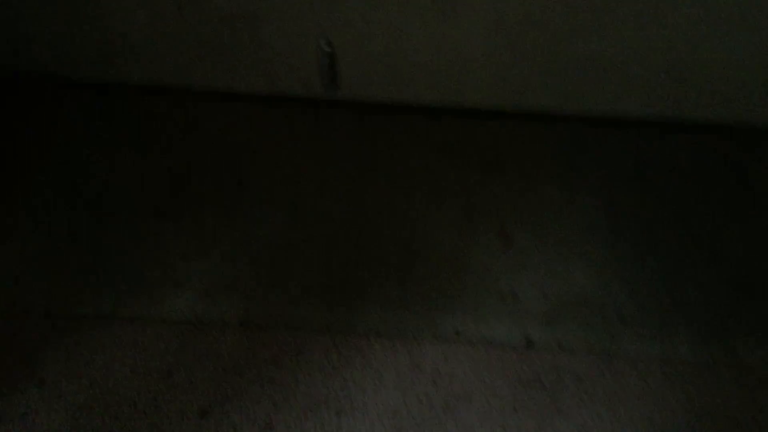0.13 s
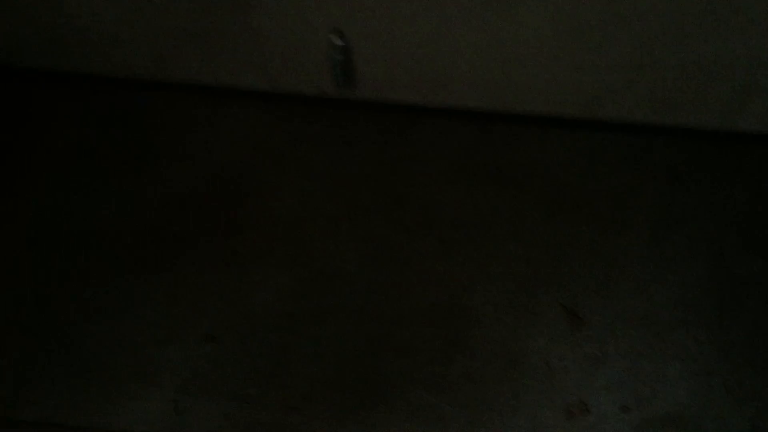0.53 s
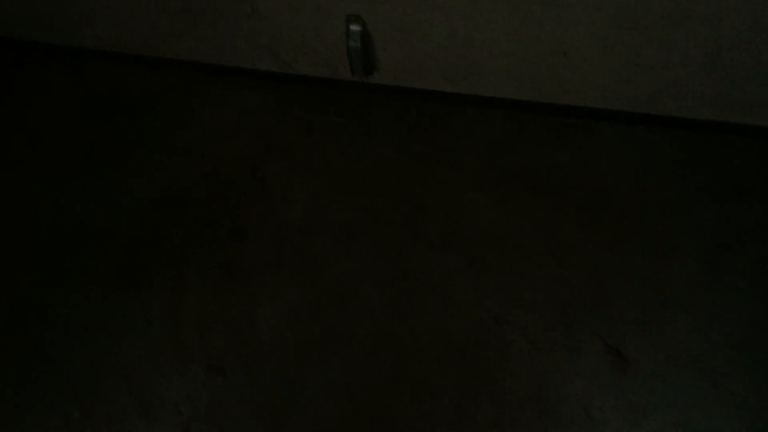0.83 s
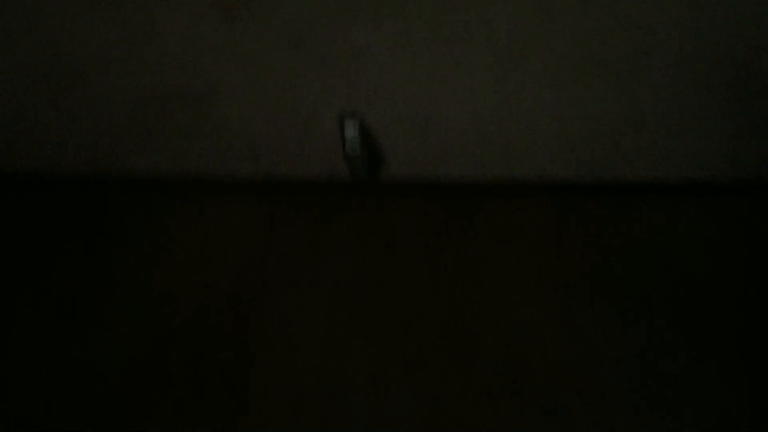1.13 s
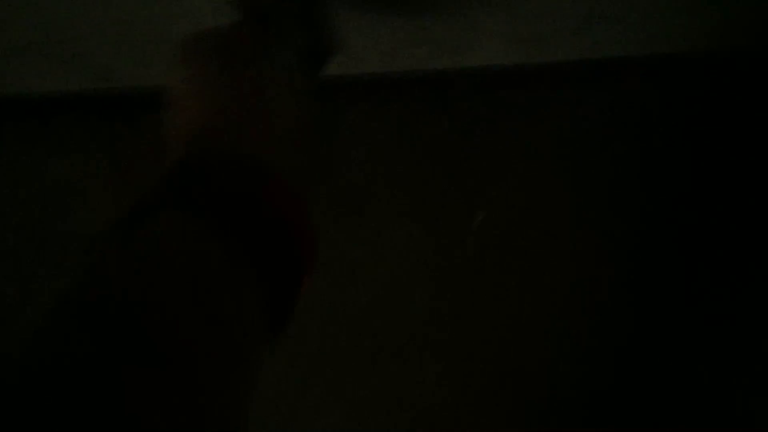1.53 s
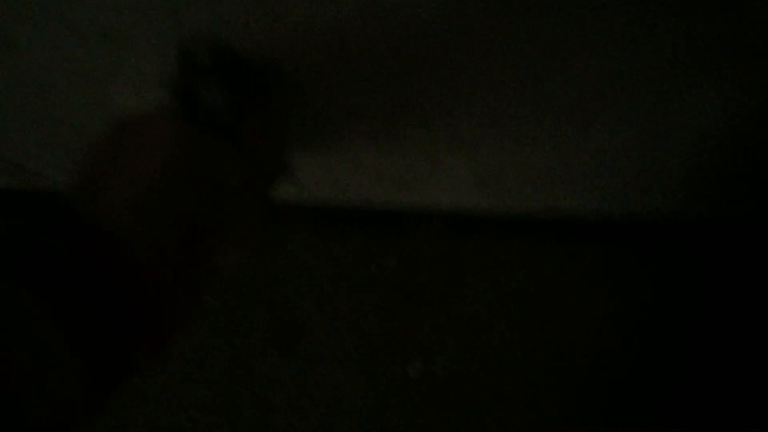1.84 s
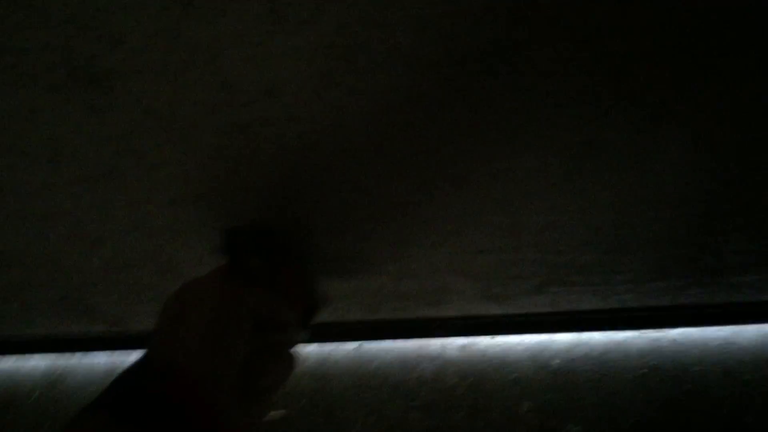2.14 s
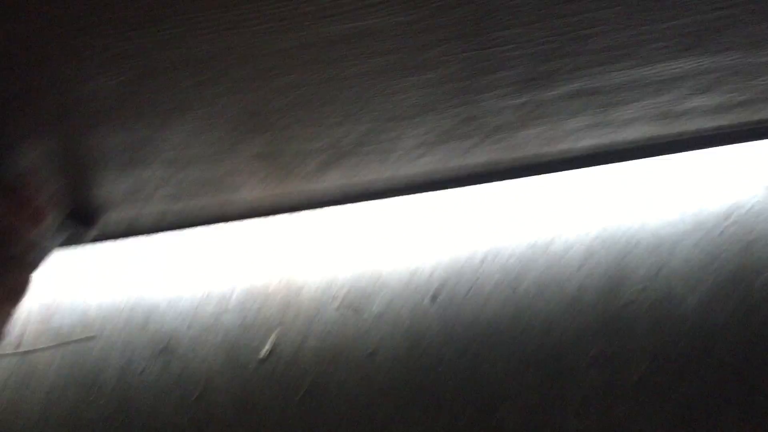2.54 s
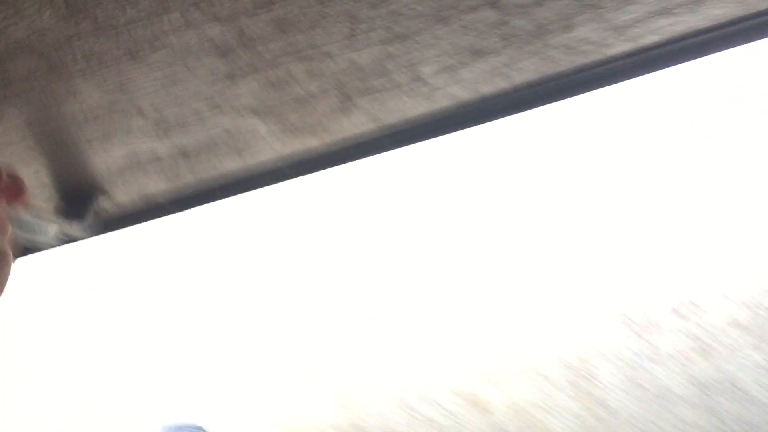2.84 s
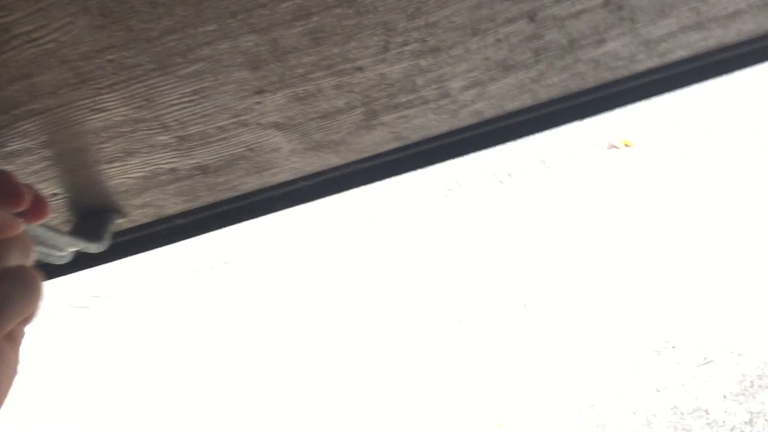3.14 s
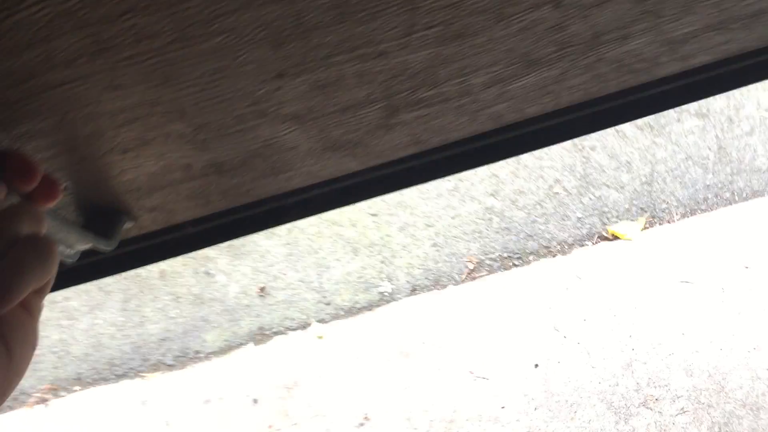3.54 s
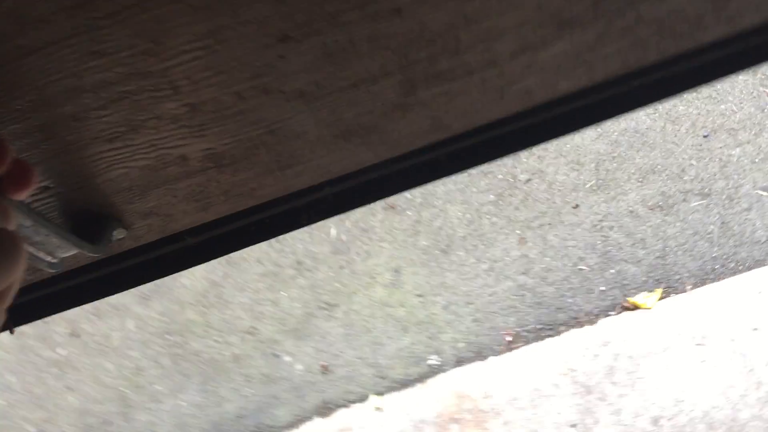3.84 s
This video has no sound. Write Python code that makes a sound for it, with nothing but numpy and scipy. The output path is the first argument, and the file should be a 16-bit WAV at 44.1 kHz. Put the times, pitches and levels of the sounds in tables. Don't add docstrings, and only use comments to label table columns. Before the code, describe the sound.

A metal garage door opens, heard close up inside a garage with short echo. Quiet low air and soft gritty shoe scuffs fill the first 1.4 seconds. A hand clanks the handle at 1.4; the latch turns and buzzes around 1.65, releasing sharply near 2.0. Rattles and a rough squeal follow at 2.3-2.6, a very loud bang at 2.67, then from 2.9 grinding, clattering, booming rolling continues to the cut-off at 4.

```python
import sys
import numpy as np
from scipy import signal
from scipy.fft import rfft, irfft, next_fast_len
from scipy.io import wavfile
from scipy.ndimage import uniform_filter1d, map_coordinates

SR = 44100
rng = np.random.default_rng(int(sys.argv[2]) if len(sys.argv) > 2 else 0)


def to_wav(sig):
    pcm = np.clip(np.atleast_2d(sig), -1, 1) * 32767
    pcm = np.round(pcm).astype(np.int16)
    wavfile.write(sys.argv[1], SR, pcm.T)


def invert_db(x):
    u = np.asarray(x, float) / 20
    return 10 ** u


N = 176400
T = np.arange(N) / SR


def unit(x):
    return x / np.sqrt(np.mean(x ** 2) + 1e-20)


def along(points, hz):
    f, v = np.transpose(points)
    return np.interp(np.log(hz + 1), np.log(f + 1), v)


def curve(rows, outside=-120):
    s, v = np.transpose(rows)
    return np.interp(T, s, v, left=outside)


def wobble(rate):
    knots = rng.standard_normal(int(N * rate / SR) + 4)
    return map_coordinates(knots, [T * rate])


def filtered(x, response):
    m = next_fast_len(len(x) + 8192)
    return irfft(rfft(x, m) * response(np.fft.rfftfreq(m, 1 / SR)), m)[:len(x)]


def peaks(table):
    def response(f):
        return sum((-1) ** k * invert_db(db) * 1j * f * w / (c * c - f * f + 1j * f * w)
                   for k, (c, w, db) in enumerate(table))
    return response


def grit(n, spiky_db):
    z = signal.stft(rng.standard_normal(n), nperseg=128)[2]
    patches = uniform_filter1d(rng.standard_normal(z.shape), size=4, axis=0)
    patches = uniform_filter1d(patches, size=3, axis=1)
    moments = uniform_filter1d(rng.standard_normal(z.shape[1]), size=2)
    size = unit(patches) + 0.69 * unit(moments)
    return unit(signal.istft(z * invert_db(spiky_db * size), nperseg=128)[1][:n])


def bursts(rows, response, attack_s, spiky_db):
    out, t = np.zeros(N + SR), T[:SR // 2]
    for s, db, bright_db, t60 in rows:
        def colour(f):
            return response(f) * invert_db(bright_db * np.log2(f / 3000 + 0.023))
        spray = unit(filtered(grit(len(t), spiky_db), colour))
        fade = invert_db(db - 8 - 60 * t / max(t60, .005))
        out[round(s * SR):][:len(t)] += fade * (1 - np.exp(-t / attack_s)) * spray
    return out[:N]


def rings(rows):
    out, t = np.zeros(N + SR), T[:SR // 2]
    for s, db, hz, t60 in rows:
        note = invert_db(db - 60 * t / t60) * np.sin(2 * np.pi * hz * t)
        out[round(s * SR):][:len(t)] += note * (1 - np.exp(-t / 0.00029))
    return out[:N]


def rolling():
    # [t/s, level/dB]
    effort = [(1.925, -55), (1.945, -41.5), (2.08, -42), (2.22, -42), (2.3, -33.5), (2.4, -45),
              (2.6, -37.5), (2.65, -37.5), (2.78, -44.5), (2.87, -29.5), (3.15, -31), (3.65, -31.5),
              (4, -28.5)]
    # [f/Hz, level/dB]
    grind_tone = [(150, -24), (250, 1), (443, -2.5), (633, 0.5), (2740, -6), (8430, -23), (16600, -37.5),
                  (17800, -54)]
    # [f/Hz, width/Hz, level/dB]
    panel_notes = [(55.7, 25, -4.5), (98.3, 17.7, -1), (137.6, 32, -7.5), (201.7, 22.3, -6),
                   (289.2, 28, -12.5), (620, 66, -16.5)]
    # [t/s, level/dB, brightness/dB, t60/s]
    joints = [(2.046, -33, 8, 0.2), (2.16, -25.5, 5.5, 0.088), (2.2388, -28, 10, 0.54),
              (2.2724, -7.5, 0, 0.17), (2.2963, -12, 5, 0.063), (2.6545, -4, -3, 0.066),
              (2.808, -23, 11.5, 0.15), (2.8355, -12, 4.5, 0.28), (2.9025, -1, 5, 0.091),
              (2.9374, -6.5, 11, 0.16), (2.9753, -7, 2, 0.18), (3.0433, -8, 2.5, 0.26),
              (3.1616, -13.5, 3, 0.23), (3.2213, -17.5, 1.5, 0.36), (3.3294, -8.5, 4.5, 0.096),
              (3.422, -11, 8.5, 0.039), (3.4511, -8, -0.5, 0.15), (3.5263, -12, 5, 0.098),
              (3.7017, -7.5, 1, 0.17), (3.7236, -9.5, 1, 0.16), (3.9282, -21.5, 5, 0.22),
              (3.9829, -15, 2.5, 0.14)]
    effort_db = curve(effort)
    grind = unit(filtered(grit(N, 1.5), lambda f: invert_db(along(grind_tone, f)))) + invert_db(-3) * flecks()
    grind_db = effort_db + 0.18 + 1.93 * wobble(25.14) + 2.06 * wobble(70)
    clatter = bursts(joints, steel, attack_s=0.0053, spiky_db=1.5)
    boom = unit(filtered(rng.standard_normal(N), peaks(panel_notes)))
    top_db, boom_db, boom_grows = effort_db[-1], 2, 1
    boom_level_db = top_db + boom_db + boom_grows * (effort_db - top_db) + 0.93 * wobble(12)
    return invert_db(grind_db) * grind + clatter + invert_db(boom_level_db) * boom


def flecks():
    count, middle_hz, pitch_spread, ring_cycles, scatter_db = 1800, 1907, .45, 20.5, 3
    when, pitch = rng.random(count), rng.standard_normal(count)
    size = np.minimum(rng.exponential(size=count), np.pi)
    hz, t = middle_hz * np.exp(pitch_spread * pitch)[:, None], T[:2048]
    level_db = scatter_db * size[:, None] - 60 * t * hz / (2 * np.pi * ring_cycles)
    pings = invert_db(level_db) * np.sin(2 * np.pi * hz * t)
    at = (N / 2 * (1 + when)).astype(int)[:, None] - SR // 10 + np.arange(len(t))
    out = np.bincount(at.ravel(), pings.ravel(), N)[:N]
    return out / np.sqrt(np.mean(out[N // 2:] ** 2))


def steel(f):
    # [f/Hz, level/dB]
    knock_tone = [(410, -35), (700, -13), (1990, 5), (2750, 7), (11400, -20.5), (16500, -35), (17800, -51)]
    # [f/Hz, width/Hz, level/dB]
    track_notes = [(1000, 76, -5.5), (1800, 30, 5), (2500, 130, -8.5), (2740, 210, 0), (3350, 31, -28)]
    detune, scatter_db, ring_db = .05, 3.5, 8.5
    luck = rng.standard_normal((len(track_notes), 2))
    woken = [(c * (1 + detune * a), w, db + scatter_db * b)
             for (c, w, db), (a, b) in zip(track_notes, luck)]
    return invert_db(along(knock_tone, f)) + invert_db(ring_db) * peaks(woken)(f)


def thuds():
    # [t/s, level/dB, f/Hz, t60/s]
    jolts = [(.232, -42, 189, 0.14), (.655, -50.5, 172, 0.38), (1.597, -25.5, 1330, 0.028),
             (1.41, -25.5, 216, 0.11), (1.4143, 5, 1410, 0.0021), (1.65, -18, 76, 0.17),
             (1.652, -22.5, 180.6, 0.092), (1.66, -30, 1548, 0.12), (1.66, -32, 1810, 0.11),
             (1.868, -30.5, 88, 0.22), (1.98, -21.5, 472, 0.11), (1.99, -19.5, 620, 0.054),
             (1.995, -24, 134, 0.089), (2.25, -19.5, 86, 0.096), (2.3, -23, 100, 0.17),
             (2.355, -20.5, 74, 0.08), (2.902, -8.5, 2740, 0.061), (2.903, -8.5, 3350, 0.043),
             (2.668, 2, 1800, 0.01), (2.669, 0.5, 3340, 0.014), (2.669, -6.5, 2660, 0.016),
             (2.668, -10, 1000, 0.041), (2.676, -4, 191, 0.035), (2.881, -2.5, 128, 0.05),
             (2.893, -11, 218, 0.05), (3.25, -17, 91, 0.28), (3.255, -21, 186, 0.17),
             (2.672, -18.5, 447, 0.033), (3.715, -16.5, 97, 0.36)]
    return rings(jolts)


def squeal():
    # [f/Hz, width/Hz, level/dB]
    hinge_notes = [(299, 33, 4.5), (460, 110, -6.5), (1142, 165, -0.5), (1730, 91, -4), (2317, 93, -1.5),
                   (2680, 43, -5), (2820, 59, -3.5), (3176, 88, -2.5), (4600, 90, -18.5), (6230, 60, -16),
                   (7300, 180, -24)]
    # [t/s, level/dB]
    squeal_level = [(2.405, -63), (2.412, -30), (2.47, -36), (2.52, -26), (2.6, -39.5), (2.615, -48)]
    slips_per_s, alternate, scatter_db = 585, 0.27, 1.5
    rate = slips_per_s * (1 + .05 * wobble(30) + .08 * wobble(300))
    slips = np.diff(np.floor(np.cumsum(rate) / SR), prepend=0)
    slips = slips * (1 + alternate * np.cos(np.pi * np.cumsum(slips)))
    drag = unit(slips * invert_db(scatter_db * rng.standard_normal(N))) + 0.65 * grit(N, 2.7)
    level_db = curve(squeal_level + [(2.66, -88)]) + 2.5 * wobble(45)
    return invert_db(level_db) * unit(filtered(drag, peaks(hinge_notes)))


def whine():
    middle_s, length_s, top_hz, arch_hz, top_db = 2.5, .06, 5570, 148, -42
    u = (T - middle_s) / length_s
    hz = top_hz - arch_hz * u ** 2 + 150 * wobble(640)
    note = np.sin(2 * np.pi * np.cumsum(hz) / SR)
    return invert_db(top_db - 4.7 * u ** 4 + 4.9 * wobble(120)) * note


def squeaks():
    # [t/s, length/s, level/dB, f/Hz, width/Hz]
    rubs = [(0.716, .07, -68, 12000, 400), (0.718, .06, -67, 13900, 300), (0.101, 0.11, -58.5, 250, 120),
            (1.27, 0.077, -56, 1220, 500), (1.313, 0.065, -51, 905, 500), (1.641, 0.094, -41, 370, 202),
            (1.739, 0.074, -62, 4500, 200), (1.742, 0.077, -62, 8850, 497), (1.755, 0.054, -54, 12400, 600),
            (1.85, 0.08, -60.5, 4600, 120), (1.651, 0.013, -37.5, 4600, 500),
            (2.046, 0.066, -41, 2110, 150), (2.105, .07, -49, 5800, 200), (2.094, 0.056, -45, 9000, 6000),
            (2.391, 0.04, -57.5, 8700, 250), (2.429, 0.079, -55, 7800, 300), (2.46, .06, -58, 8900, 200),
            (2.449, 0.064, -51.5, 10000, 200), (2.565, 0.048, -30, 1910, 200),
            (2.677, 0.09, -50, 11000, 6000), (2.769, 0.098, -45.5, 8950, 5000),
            (2.863, 0.044, -24.5, 1000, 150), (2.932, 0.023, -26, 6750, 400),
            (3.092, .04, -48, 11000, 6000), (3.22, .015, -42, 11500, 500), (3.293, 0.052, -30.5, 2380, 200),
            (3.585, 0.016, -41, 8400, 400), (3.716, .06, -38, 6150, 300), (3.98, 0.023, -41, 12400, 1400)]
    out = np.zeros(N + SR)
    for s, length, db, hz, width_hz in rubs:
        u = np.minimum(T[:SR // 8] / length, 1)
        band = unit(filtered(grit(len(u), 3.0), lambda f: np.exp(-((f - hz) / width_hz) ** 2)))
        out[round(s * SR):][:len(u)] += invert_db(db) * np.sin(np.pi * u ** 0.64) ** 2 * band
    return out[:N]


def handle():
    # [f/Hz, width/Hz, level/dB]
    handle_notes = [(1540, 31, 16), (1820, 24, 4), (4360, 160, -11)]
    # [t/s, level/dB, brightness/dB, t60/s]
    taps = [
        (1.658, -23, 3, 0.12),
        (1.747, -34.5, 3, 0.11),
    ]
    # [t/s, level/dB, brightness/dB, t60/s]
    clanks = [
        (1.403, -14.5, -5, 0.11),
        (1.537, -28, -2, 0.047),
        (1.596, -23, -1, 0.035),
        (1.654, -22.5, -0.5, 0.02),
        (1.827, -38, 0.5, 0.043),
        (1.945, -30.5, 7, 0.27),
        (1.978, -6.5, -6.5, 0.018),
        (2.667, 3.5, -4, 0.024),
        (2.878, -6.5, -3.5, 0.15),
              (2.0857, -13.5, 10, 0.018), (2.548, -8.5, 11.5, 0.012), (.203, -43, 0, 0.0092),
             (1.678, -24.5, -5, 0.022), (2.0473, -32, -5, 0.022), (2.1142, -22.5, -2.5, 0.036),
             (2.8385, -11, 2.5, 0.034), (3.3055, -24, 0, 0.038), (3.6422, -27, 1, .03),
             (3.7914, -23, 0.5, 0.047), (3.8382, -27, 3, .03)]
    # [f/Hz, level/dB]
    clank_tone = [(180, -31), (300, -17.5), (717, -13.5), (3340, -5.5), (4320, -11.5), (13800, -22),
                  (17800, -35)]
    ring = bursts(taps, peaks(handle_notes), attack_s=0.0019, spiky_db=1.5)
    blows = bursts(clanks, lambda f: invert_db(along(clank_tone, f)), attack_s=0.00028, spiky_db=1.6)
    return ring + blows


def feet():
    # [t/s, level/dB, brightness/dB, t60/s]
    scuffs = [(0.104, -48.5, 1.5, 0.65), (0.236, -42, 1.5, 0.3), (0.55, -33, 0, 0.67),
              (0.574, -29.5, 3, 0.13), (0.685, -37, -7, 0.35), (1.055, -27, 0.5, 0.21),
              (1.074, -33.5, -2.5, 0.12), (1.153, -35, 6, 0.2), (1.319, -44, 2.5, 0.81),
              (1.392, -25.5, 1, 0.39), (1.746, -35.5, 0, 0.24)]
    # [f/Hz, level/dB]
    scuff_tone = [(120, -28), (200, -9.5), (834, -4.5), (1700, -1), (9250, -23.5), (16900, -41),
                  (17800, -49)]
    return bursts(scuffs, lambda f: invert_db(along(scuff_tone, f)), attack_s=0.003, spiky_db=3.0)


def garage(x):
    # [f/Hz, t60/s]
    echo_t60 = [(100, 0.64), (2000, 0.28), (15000, 0.29)]
    out, step = np.zeros(N + SR), SR // 4
    for i in range(0, N, step):
        hz, t, z = signal.stft(rng.standard_normal(SR // 2), SR, nperseg=256)
        fade = invert_db(-60 * t / along(echo_t60, hz)[:, None])
        tail = signal.istft(z * fade, SR, nperseg=256)[1]
        wet = signal.fftconvolve(x[i:i + step], tail / np.linalg.norm(tail))
        out[i + 150:][:len(wet)] += wet
    return out[:N]


def air():
    # [f/Hz, level/dB]
    air_tone = [(18, -71), (30, -48), (97, -8), (138, -23.5), (435, -37), (538, -34), (12000, -46.5),
                (17800, -51)]
    # [t/s, level/dB]
    air_level = [(0, -62.5), (1.6, -52), (4, -62)]
    hiss = unit(filtered(rng.standard_normal(N), lambda f: invert_db(along(air_tone, f))))
    drone = unit(filtered(rng.standard_normal(N), peaks([(97, 76, 0)])))
    swell_s, swell_length_s, swell_db = 0.91, 0.097, -49.5
    swell = invert_db(swell_db) * np.exp(-((T - swell_s) / swell_length_s) ** 2)
    swell = swell * np.sin(2 * np.pi * 89 * T + wobble(30))
    return invert_db(curve(air_level)) * (hiss + invert_db(-9) * drone) + swell


def scene():
    near = feet() + handle() + rolling() + squeal() + whine() + squeaks()
    jolt = thuds()
    echo = invert_db(-10.5) * garage(near + 0.69 * jolt)
    return (near + jolt + echo + air())[None]


def top_cut(x):
    return signal.sosfilt(signal.butter(12, 18000, fs=SR, output="sos"), x)


def record(dry):
    # [f/Hz, level/dB]
    mic_tone = [(4500, 0), (6000, 1), (7400, -1), (9000, 0.5), (10500, -2.5), (12200, 0.5), (15000, -3.5)]
    start_s, bass_cut_hz = .083, 45

    def microphone(f):
        u = f / bass_cut_hz
        return invert_db(along(mic_tone, f)) * (1j * u) ** 2 / (1 + 1.4j * u - u ** 2)

    heard = filtered(dry[0], microphone) * (T > start_s)
    mix = filtered(np.clip(heard, -1, 1), lambda f: f < 18000)[None]
    return top_cut(mix)


dry = scene()
out = record(dry)
to_wav(out)
```